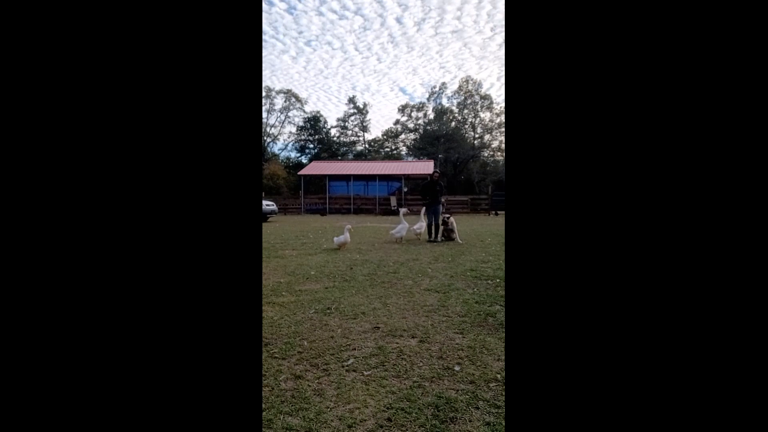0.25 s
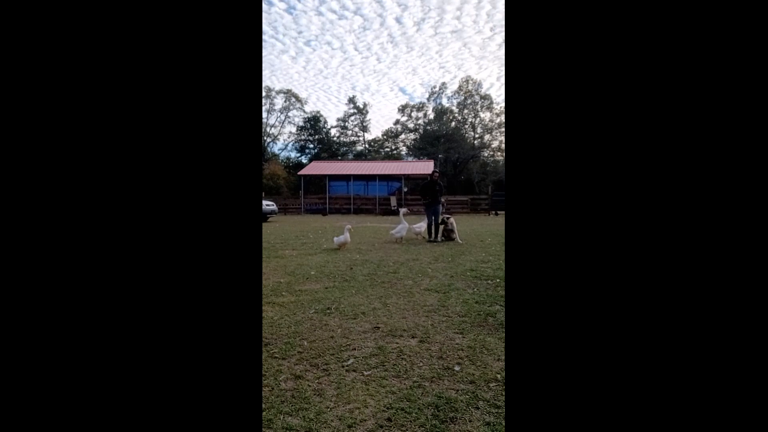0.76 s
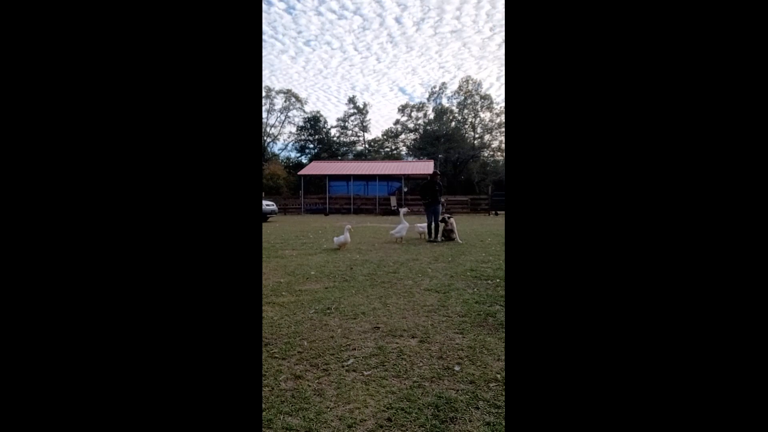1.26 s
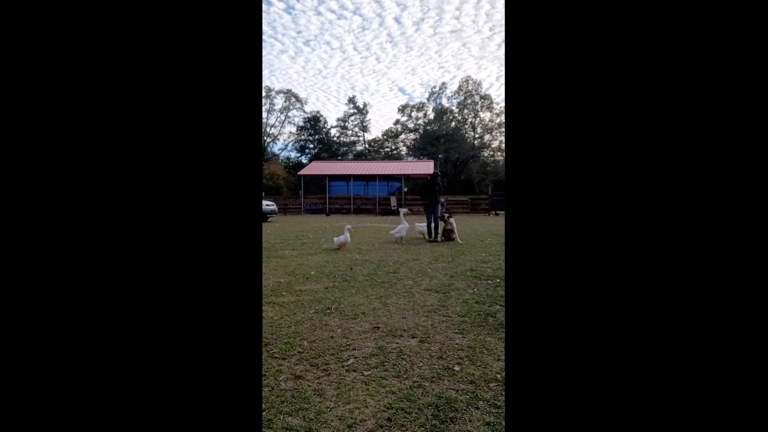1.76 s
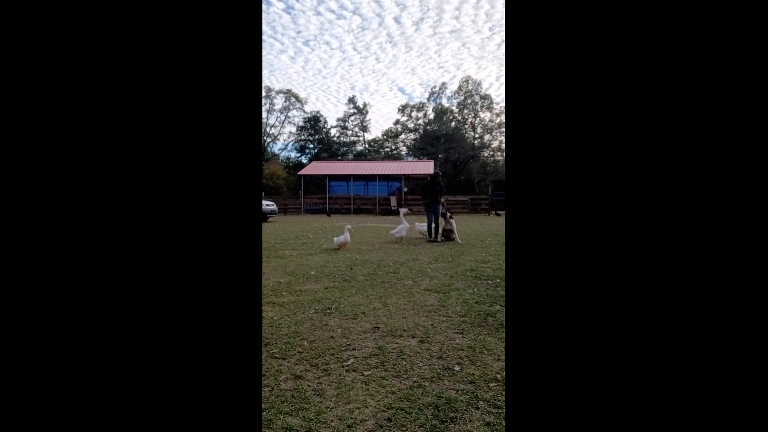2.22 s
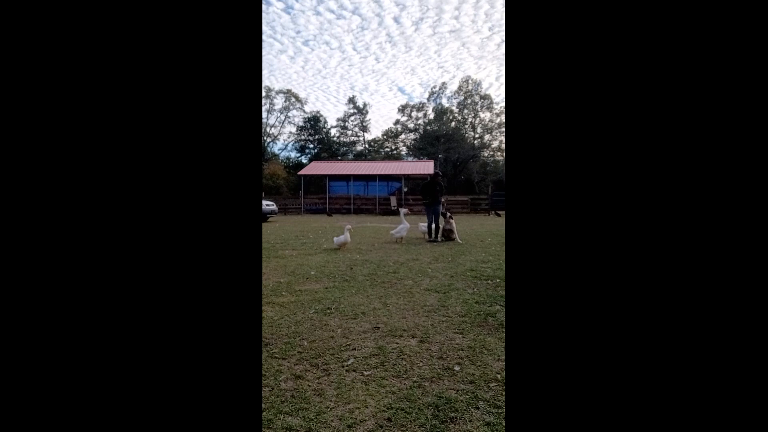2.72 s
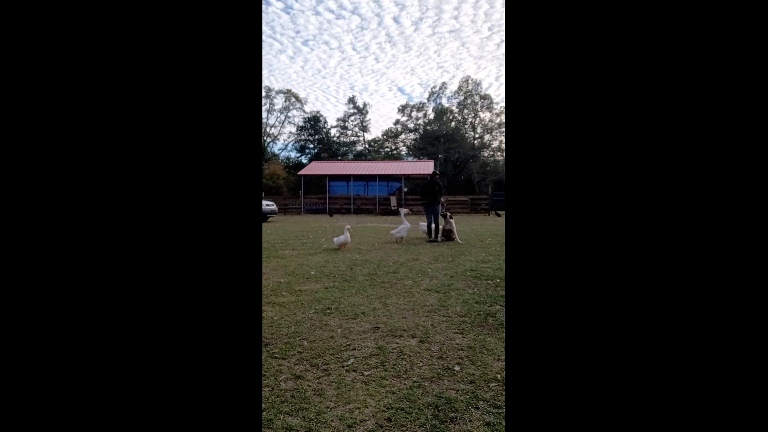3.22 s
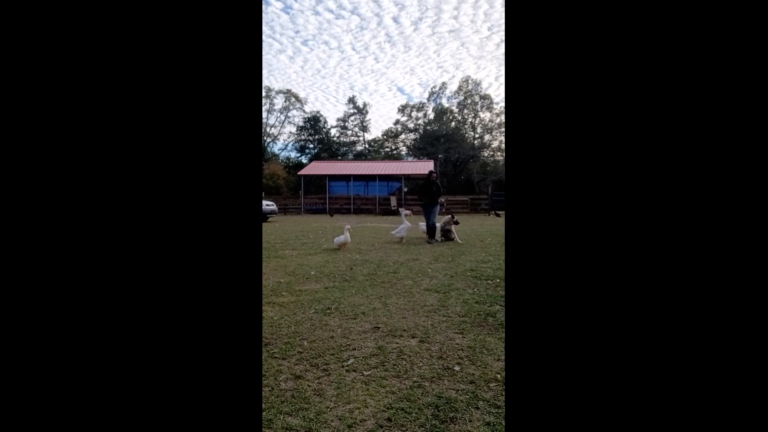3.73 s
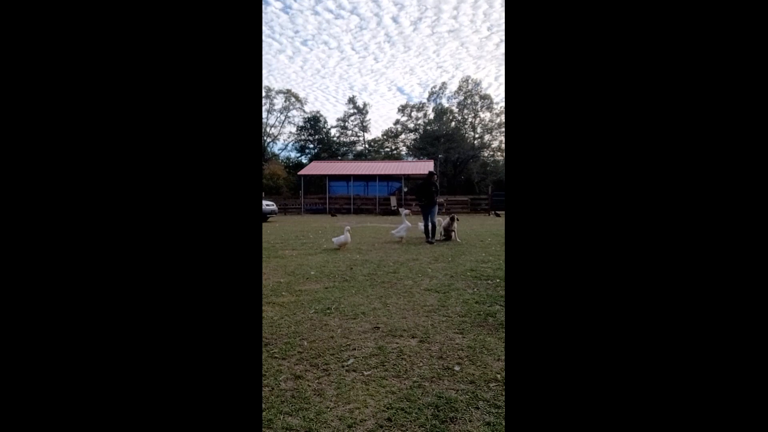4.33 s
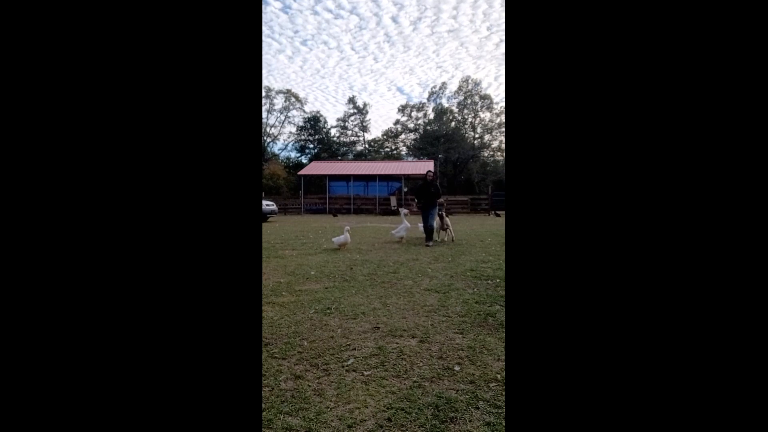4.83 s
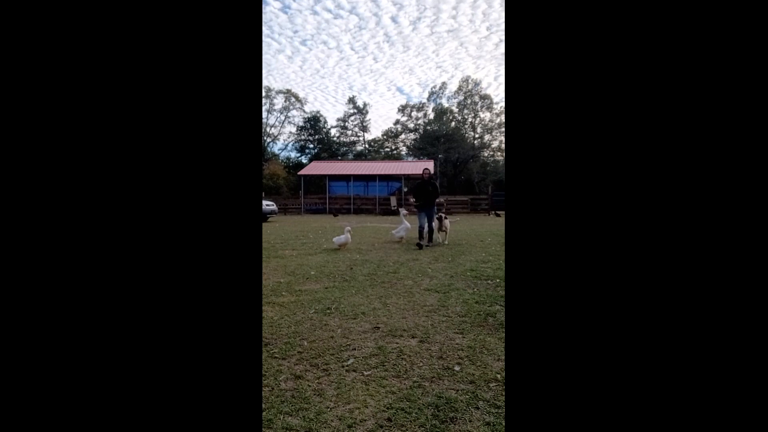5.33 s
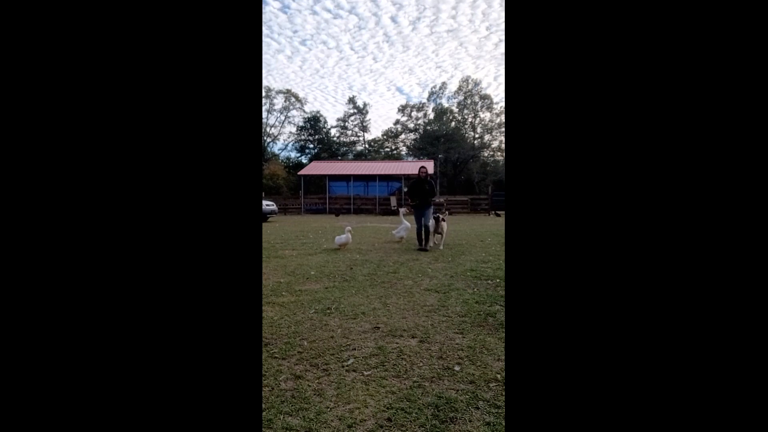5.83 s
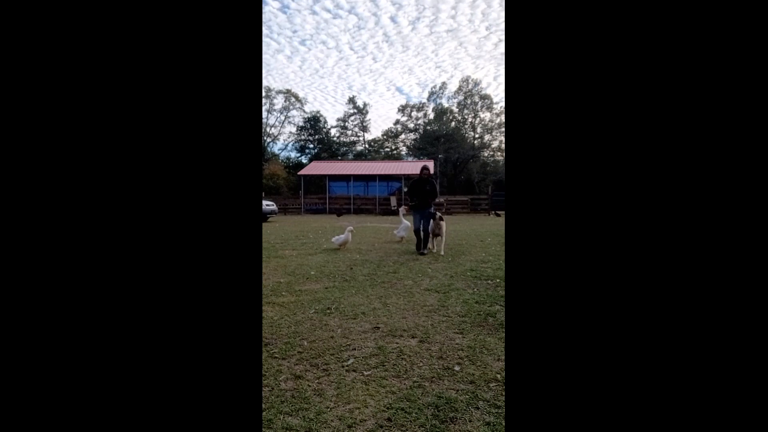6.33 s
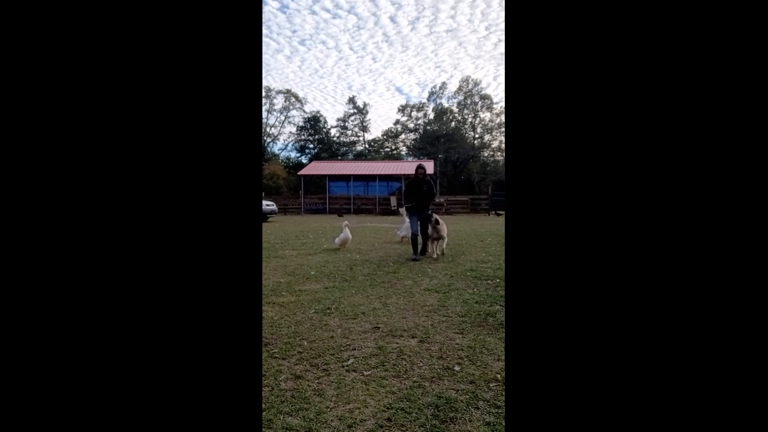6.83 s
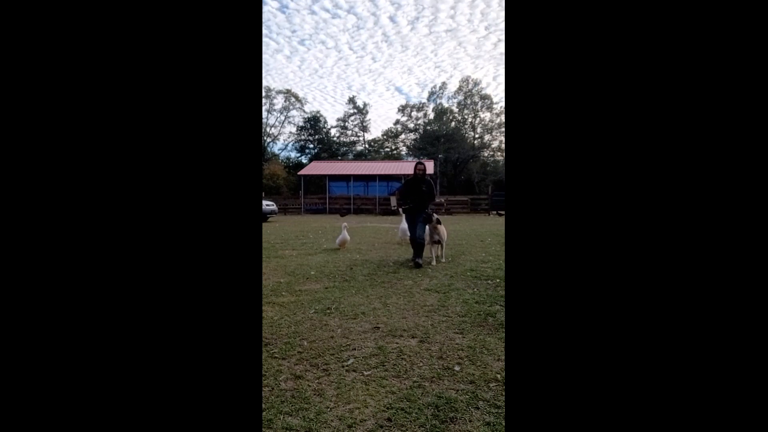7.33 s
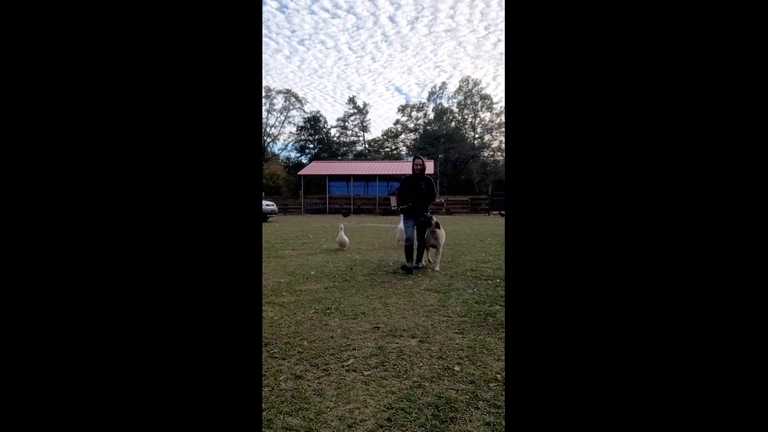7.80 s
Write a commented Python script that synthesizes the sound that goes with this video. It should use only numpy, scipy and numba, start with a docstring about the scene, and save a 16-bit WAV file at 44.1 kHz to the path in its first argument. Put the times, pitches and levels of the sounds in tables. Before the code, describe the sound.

The setting is a quiet open field with a low rumble, thin hiss and the faint hum of a distant idling engine throughout. A few soft dry ticks fall in the first second. At about 0.9 seconds a goose gives a raspy honk that breaks into a clear note, echoing lightly off a shed and trees. A faint far bird calls around 2.1 seconds. At 3.2 seconds a dog close to the microphone gives a short whine, followed at once by a long one from 3.4 to 5.1 seconds. It is high and nearly dry, hoarse in stretches, thinning to a whistle and ending in a tiny croak. A small tick follows at 5.4 seconds. The geese return with a soft broken honk at 6 seconds, a louder one from 6.5 to 6.9, and a longer, shriller run from 7.4 to 7.9 seconds.

```python
"""An open grass field, where geese honk and a shed and the tree line throw the honks back.
Each honk is a rattle of syrinx pulses that breaks into clear notes, coloured by resonances.
In the middle an animal close by, likely a dog, gives a short and a long whine: a whistle with
subharmonics, shaped by its muzzle. Below lie low rumble, the hum of a distant idling engine,
thin hiss, a few dry ticks and faint far birds."""
import sys
import numpy as np
from scipy import signal
from scipy.fft import rfft, irfft, next_fast_len
from scipy.io import wavfile
from scipy.ndimage import uniform_filter1d
from numba import njit

SR = 44100
rng = np.random.default_rng(int(sys.argv[2]) if len(sys.argv) > 2 else 0)


def dump_mix(stems):
    """Bounce the given channels to the path in sys.argv[1] as a 16-bit WAV at rate SR."""
    frames = np.atleast_2d(stems).T  # one column per channel
    limited = np.clip(frames, -1, 1)  # hard clip at full scale
    pcm = np.round(limited * 32767).astype(np.int16)
    wavfile.write(sys.argv[1], SR, pcm)


N = 355425
T = np.arange(N) / SR
CUTOFF_HZ = 15900
WHINE_ATTACK_S, WHINE_RELEASE_S = .022, .013

# honk syllables: (start t/s, length t/s, relative level/dB, swell/dB, chest level/dB,
#   brightness level/dB, rasp level/dB, sizzle level/dB, top level/dB, peak pulse rate f/Hz,
#   lower resonance first f/Hz, last f/Hz, upper resonance f/Hz)
HONKS = [(0.846, 0.023, -42.5, 6.0, -2, -24.5, -18, -21, -31, 150, 1480, 1570, 3570),
         (0.87, 0.12, -31.5, -10, 5.0, -6, -7, -14.5, -27, 204, 1380, 1090, 3190),
         (1.0, 0.16, -39.5, -8.5, -4.0, -11.5, -12.5, -29, -38.0, 126, 1470, 1290, 2720),
         (5.935, 0.094, -44.5, 12.5, 3, -4, -4, -18.0, -31, 111, 1610, 1420, 3370),
         (6.04, 0.068, -50, 1, 1, -9.0, -0.5, -22.5, -31, 135, 1530, 1570, 3120),
         (6.1, 0.058, -47.5, -1.5, 4.5, -0.5, 4.5, -21, -29.5, 153, 1390, 980, 2720),
         (6.537, 0.088, -33.5, 14.5, 0.5, -10.5, -11.5, -25, -27, 143, 1370, 1494, 2900),
         (6.635, 0.043, -45, 12, 7.5, -3, -7, -21, -31, 120, 1443, 1340, 3183),
         (6.685, 0.14, -33, 6.5, 7, -1.5, -6, -16.5, -30.5, 216, 1078, 1180, 3070),
         (6.803, 0.066, -31, -15, -11, -2, -9, -10, -25.5, 220, 1460, 1460, 2580),
         (7.419, 0.112, -29.5, 4.5, 3.5, -7.5, -11.5, -27, -39.5, 150, 1470, 1010, 2926),
         (7.525, 0.07, -39.5, -12, 8.5, 5, -2.5, -9.5, -27, 144, 1146, 899, 2600),
         (7.634, 0.094, -31.5, -0.5, 9, -2, -7, -10.5, -22.5, 169, 1098, 1210, 2830),
         (7.712, 0.07, -27, -6, -0.5, -8, -9, -10.5, -13, 204, 1152, 1501, 3080),
         (7.775, 0.041, -32.5, -7, 6, 7.5, 0, -4, 0, 136, 1440, 1470, 2960),
         (7.808, 0.11, -33, -10, 6.5, 1, -7, -12.5, -37, 141, 1180, 920, 2440)]
# clear notes in the honks: (start t/s, end t/s, first f/Hz, middle f/Hz, last f/Hz,
#   level/dB over the rattle, even harmonics level/dB, overtone roll-off f/Hz)
NOTES = [(.868, 1.005, 900, 1008, 865, 10, 3, 3300), (.87, 1.015, 485, 468, 405, 1, 0, 3000),
         (.985, 1.185, 742, 728, 640, 20, 6, 5200), (5.945, 6.055, 450, 463, 445, 4, 0, 2200),
         (6.035, 6.125, 735, 765, 815, 9, 5, 2800), (6.1, 6.18, 345, 352, 340, 3, 0, 1200),
         (6.7, 6.825, 182, 197, 203, 8, 0, 1900), (6.795, 6.845, 1295, 1315, 1320, 7, 10, 3000),
         (6.8, 6.89, 722, 742, 733, 11, 9, 4500), (7.645, 7.72, 148, 163, 172, 7, 0, 2000),
         (7.69, 7.79, 338, 352, 362, 10, 0, 5500), (7.735, 7.825, 1410, 1468, 1492, 12, 0, 16000),
         (7.81, 7.885, 750, 738, 700, 1, 6, 6000)]
# whines: (start t/s, break into the low register t/s, end t/s, relative level/dB)
WHINES = [(3.154, 3.21, 3.409, 2.5), (3.385, 3.501, 5.108, 0.5)]
# thinning of the whine from a full cry to a whistle: (t/s, share 0-1)
THINNING = [(3.19, 0.14), (3.25, 0.57), (3.38, 0.37), (3.48, 0.08), (4.22, 0.12), (4.45, 0.83), (4.68, 1),
            (4.87, 0.95), (5.03, 0.9), (5.07, 0.86)]


def amp(db):
    """Amplitude ratio of a level in decibels."""
    return 10 ** (np.asarray(db) / 20)


def unit(x):
    """Normalisation to rms 1."""
    return x / np.sqrt(np.mean(x ** 2) + 1e-20)


def curves(rows, t=T):
    """Linear interpolation in time of each column of a table."""
    times, *columns = np.transpose(rows)
    return [np.interp(t, times, column) for column in columns]


def at_hz(points, hz):
    """Interpolation of a spectrum on a log-frequency axis."""
    f, value = np.transpose(points)
    return np.interp(np.log(np.maximum(hz, 1)), np.log(f), value)


def colour(x, points):
    """Zero-phase filtering by a spectral envelope of (f/Hz, level/dB) points."""
    size = next_fast_len(N + SR // 4)
    gain = amp(at_hz(points, np.fft.rfftfreq(size, 1 / SR)))
    return irfft(rfft(x, size) * gain, size)[..., :N]


def band(x, low_hz, high_hz, order=4):
    """Band-pass filtering."""
    sos = signal.butter(order, [low_hz, min(high_hz, .48 * SR)], "band", fs=SR, output="sos")
    return signal.sosfilt(sos, x + 1e-18)


def wobble(rate_hz, size=N):
    """Random modulation: low-passed noise of rms 1."""
    noise = rng.standard_normal(size + SR)
    return unit(signal.sosfilt(signal.butter(2, rate_hz, fs=SR, output="sos"), noise)[SR:])


def gate(start, end, edge_s, t=T):
    """Trapezoidal window between two times."""
    return np.clip(np.minimum(t - start, end - t) / edge_s + .5, 0, 1)


def progress(start, length, t=T):
    """Normalised time, -1 to 1 through an event."""
    return np.clip(2 * (t - start) / length - 1, -1, 1)


def envelope(start, end, attack_s, release_s):
    """Linear attack, hold and exponential decay."""
    return np.clip((T - start) / attack_s, 0, 1) * np.exp(-np.clip((T - end) / release_s, 0, 20))


def articulate(source, levels, edges_hz, window_s):
    """Time-varying filtering by throat and mouth: each band is evened, then follows its own level."""
    out, size = np.zeros(N), int(window_s * SR)
    for level, low, high in zip(levels, edges_hz, edges_hz[1:]):
        part = band(source, low, high, order=6)
        power = uniform_filter1d(uniform_filter1d(part ** 2, size), size)
        out += level * part / np.sqrt(np.abs(power) + 1e-9)
    return out


def stereo_noise(spectrum, width):
    """Partial coherence: coloured noise common to both ears, plus a share in antiphase."""
    mid, side = colour(rng.standard_normal((2, N)), spectrum)
    return unit(mid + width * side * np.array([[1], [-1]]))


def engine_hum():
    """Amplitude modulation: the wavering partials of a distant idling engine throb together."""
    # engine partials: (f/Hz, relative level/dB)
    partials = [(102.3, -77.5), (140.0, -76), (242.2, -76)]
    hum = 0
    for hz, db in partials:
        phase = 2 * np.pi * np.cumsum(hz * (1 + .0083 * wobble(8.7))) / SR
        hum += amp(db - 5.5) * np.sqrt(2) * np.sin(phase)
    return hum * (1 + .4 * np.cos(2 * np.pi * 17.3 * T))


def background():
    """Ambient noise: lumpy rumble, far air, engine hum and thin hiss add incoherently."""
    # course of the ambience: (t/s, relative rumble level/dB, relative air level/dB)
    field_levels = [(0.0, -65, -65.5), (1.08, -65, -65), (2.13, -65, -66.5), (2.96, -64.5, -63.5),
                    (3.39, -68.5, -65), (4.67, -74.5, -68.5), (5.12, -63.5, -63), (5.72, -69.5, -63),
                    (6.73, -62, -64.5), (7.63, -64.5, -61), (8.06, -67, -59)]
    # course of the hiss: (t/s, level/dB)
    hiss_levels = [(0, -73), (1.3, -75), (3.0, -74), (5.2, -67), (8.06, -69.5)]
    # spectra of the three noises: (f/Hz, relative level/dB)
    rumble_spectrum = [(12, -62.5), (20, -33.5), (70, -2.5), (108, -6.5), (140, 0.5), (180, -21),
                       (230, -35.5), (400, -120)]
    air_spectrum = [(76, -21.5), (130, -5), (318, -2), (367, -4.5), (746, -11.5), (884, -13), (944, -8.5),
                    (1260, -15.5), (1480, -22), (1800, -27), (3000, -52.5), (3900, -60.5), (6600, -120)]
    hiss_spectrum = [(1000, 6.5), (2200, -5.5), (6000, -9.5), (9000, -17.5), (13000, -15), (15500, -23)]
    rumble_db, air_db = curves(field_levels)
    rumble_gain = amp(rumble_db + 3 + 2.8 * wobble(24))
    rumble = rumble_gain * unit(band(stereo_noise(rumble_spectrum, width=.029), 30, 400, order=2))
    air = amp(air_db + 2.5 + 2.37 * wobble(4.1)) * stereo_noise(air_spectrum, width=.076)
    hum = engine_hum()
    hiss = amp(curves(hiss_levels)[0]) * stereo_noise(hiss_spectrum, width=.94)
    return rumble + air + hum + hiss


def ticks(level_db, crack_db):
    """Damped transients: dry ticks and scuffs are band-limited noise bursts with a faint broad crack."""
    # ticks: (t/s, relative peak level/dB, centre f/Hz, bandwidth/octaves, decay t/s)
    events = [(0.063, -64.5, 1700, 0.94, .002), (0.07, -74, 5300, 0.72, .012),
              (0.409, -67.5, 5740, 0.74, 0.0087), (0.658, -56.5, 2440, 1.3, .0015),
              (0.668, -57.5, 2370, 1.1, .0012), (0.777, -70.5, 2680, 1, 0.017),
              (1.571, -61, 2400, 0.22, .0015), (2.785, -76, 2380, 0.46, 0.011),
              (5.406, -55, 1380, 0.63, 0.0069)]
    out, t = np.zeros((2, N)), np.arange(SR // 8) / SR
    for start, db, hz, octaves, decay_s in events:
        noise = rng.standard_normal(len(t)) + .5 * rng.standard_normal((2, len(t)))
        burst = noise * t * np.exp(-t / decay_s)
        ring = band(burst, hz / 2 ** (octaves / 2), hz * 2 ** (octaves / 2), order=2)
        tick = ring + amp(crack_db) * band(burst, 1500, 6300, order=2)
        first = int(start * SR)
        out[:, first:first + len(t)] += amp(db + level_db) * tick / np.abs(tick).max()
    return out


def far_birds():
    """Frequency modulation: thin gliding notes of far birds, made scratchy by pitch jitter."""
    # calls: (start t/s, length t/s, first f/Hz, last f/Hz, peak level/dB, jitter as a share)
    calls = [(0.49, 0.04, 1660, 1630, -62.5, .01), (2.124, 0.23, 988, 973, -61.5, .03),
             (2.61, 0.067, 3770, 3450, -77, 0.037), (2.665, 0.045, 3150, 2830, -78, .04)]
    out, scratch = np.zeros(N), wobble(300)
    for start, length, first_hz, last_hz, db, jitter in calls:
        hz = np.interp(T, [start, start + length], [first_hz, last_hz]) * (1 + jitter * scratch)
        out += amp(db) * (1 - progress(start, length) ** 2) * np.sin(2 * np.pi * np.cumsum(hz) / SR)
    return out


def honk_resonances(x, flutter_db=0, low_cut_hz=780):
    """Resonance: parallel peaks, each applied twice; the upper ones are driven through a low cut."""
    # resonances of the honk; the last is a thin, very high fizz on every honk: (f/Hz, nominal bandwidth f/Hz,
    # level/dB)
    resonances = [(140.5, 9.4, 1.5), (447, 46, 0), (1120, 298, 10), (1595, 163, 3), (1920, 366, -2.5),
                  (3110, 880, 1), (4340, 570, -12.5), (6940, 160, -5), (14700, 870, -21.5)]
    out, upper_drive = 0, band(x, low_cut_hz, 16000)
    for hz, width_hz, db in resonances:
        b, a = signal.iirpeak(hz, hz / (1.84 * width_hz), fs=SR)
        drive = upper_drive if hz > low_cut_hz else x + 1e-18
        # each resonance swells by itself
        swell = amp(flutter_db * wobble(14.4, size=len(x))) if flutter_db else 1
        out = out + amp(db) * swell * signal.lfilter(b, a, signal.lfilter(b, a, drive))
    return out


def pulse_rate(slowing=.13):
    """Repetition frequency of the rattle: highest in mid-syllable, slower at both ends."""
    rate = np.full(N, float(HONKS[0][-4]))
    for start, length, *_, peak_hz, _, _, _ in HONKS:
        on = T >= start
        rate[on] = peak_hz * (1 - slowing * progress(start, length, T[on]) ** 2)
    return rate


def rattle(jitter, uneven_db, rasp, puff_s, flutter_db):
    """Impulse excitation: uneven slaps of the syrinx, each with a puff of rasp, ring the resonances."""
    cycles = np.floor(np.cumsum(pulse_rate() * (1 + jitter * wobble(70))) / SR)
    pulses = np.diff(cycles, prepend=0) * amp(uneven_db * rng.standard_normal(N))
    decays = signal.lfilter([1], [1, -np.exp(-1 / (puff_s * SR))], pulses + 1e-18)
    puffs = decays * rng.standard_normal(N)
    return unit(honk_resonances(unit(pulses) + rasp * unit(puffs), flutter_db))


def clear_notes(jitter):
    """Periodic oscillation: the membranes lock into a harmonic tone on a short arched glide."""
    out, waver = np.zeros(N), 1 + jitter * wobble(220)
    for start, end, first_hz, middle_hz, last_hz, db, even_db, fade_hz in NOTES:
        on = slice(int(start * SR), int(end * SR))
        u = np.linspace(-1, 1, on.stop - on.start)
        hz = middle_hz + u * (last_hz - first_hz) / 2 + u ** 2 * ((first_hz + last_hz) / 2 - middle_hz)
        phase = 2 * np.pi * np.cumsum(hz * waver[on]) / SR
        tone = sum(amp(even_db * (k % 2 == 0)) * np.cos(k * phase) / (1 + (k * middle_hz / fade_hz) ** 6)
                   for k in range(1, int(CUTOFF_HZ / middle_hz) + 1))
        out[on] += amp(db) * unit(honk_resonances(tone)) * (1 - u ** 4)
    return out


def shut_beak(x, below_db=-40.5, range_db=7):
    """Level-dependent filtering: the softer a syllable, the more it takes the shut beak's colour."""
    # response of the nearly shut beak: (f/Hz, level/dB)
    response = [(200, 9), (450, 12), (750, 0), (2200, 5), (2800, 3), (3800, 11.5), (4400, -8),
                (5200, -11.5), (7000, -18)]
    shut = sum(np.clip((below_db - db) / range_db, 0, 1) * envelope(start, start + length, .01, .05)
               for start, length, db, *_ in HONKS)
    return x + np.minimum(shut, 1) * (colour(x, response) - x)


@njit
def driven_oscillator(x, step, damping):
    """A damped, driven oscillator: a two-pole band-pass of gain 1 whose centre moves."""
    out, low, mid = np.zeros(len(x)), 0., 0.
    for i in range(len(x)):
        low += step[i] * mid
        mid += step[i] * (x[i] - low - damping[i] * mid)
        out[i] = mid * damping[i]
    return out


def resonate(x, hz, width_hz):
    """Resonance at a frequency that changes with time."""
    hz = np.clip(hz, 300, 7000)
    return driven_oscillator(x, 2 * np.sin(np.pi * hz / SR), np.minimum(width_hz / hz, .5))


def moving_beak(x):
    """Formant motion: one resonance glides with the beak, one sits above, narrow ones wander."""
    lower, upper = np.full(N, float(HONKS[0][-3])), np.full(N, float(HONKS[0][-1]))
    for start, length, *_, first_hz, last_hz, upper_hz in HONKS:
        on = T >= start
        lower[on] = np.interp(T[on], [start, start + length], [first_hz, last_hz])
        upper[on] = upper_hz
    x = x + amp(8.5) * resonate(x, lower, width_hz=314) + amp(9) * resonate(x, upper, width_hz=560)
    wandering = sum(resonate(x, hz * (1 + .06 * wobble(14)), width_hz=130)
                    for hz in (2650, 3700, 4400, 5400))
    return x + amp(7) * wandering


def honk_levels(lean_db_per_octave=8):
    """Band envelopes: each syllable is an arch of level with its own colour; overlaps add in power."""
    # loss at both ends of a syllable, per band from chest to top: (level/dB)
    arches = [6, 0.92, 6.9, 7.8, 8.2, 15]
    power = np.zeros((len(arches), N))
    for start, length, db, swell_db, chest_db, *upper_db, _, first_hz, last_hz, _ in HONKS:
        shape = envelope(start, start + length, attack_s=.016, release_s=.021)
        on = shape > 1e-4
        u = progress(start, length, T[on])
        # as the lower resonance sinks, the chest gains on the band above it
        lean_db = lean_db_per_octave * np.log2(first_hz / last_hz) * u / 2
        for k, (band_db, arch_db) in enumerate(zip([chest_db + lean_db, -lean_db, *upper_db], arches)):
            power[k, on] += (shape[on] * amp(db + band_db + swell_db * u / 2 - arch_db * u ** 2)) ** 2
    return np.sqrt(power)


def geese():
    """Source and filter: rattle and clear notes pass through the same resonances and beak."""
    # band edges of a honk, from chest to top: (f/Hz)
    edges = [90, 1300, 2100, 3400, 4800, 7200, 16000]
    pulses = rattle(jitter=.055, uneven_db=1.8, rasp=.5, puff_s=.004, flutter_db=3)
    voice = moving_beak(shut_beak(pulses + clear_notes(jitter=.007)))
    return amp(-3) * articulate(voice, honk_levels(), edges, window_s=.0094)


def carry(boost_db=1, above_hz=600):
    """Propagation gain: high clear notes carry best to the shed and trees."""
    high = sum(gate(start, end, .02) for start, end, _, hz, *_ in NOTES if hz > above_hz)
    return amp(boost_db * np.minimum(high, 1))


def field_echo(x, near_db, tail_db, t60, smear_s):
    """Reflection: ground scatter, smeared echoes and a thin tail from the trees, unlike at each ear."""
    # echoes off shed and trees: (delay t/s, relative level/dB)
    echoes = [(.075, -14.5), (0.116, -17), (.19, -30)]
    # response of the reflected paths: (f/Hz, level/dB)
    spectrum = [(200, -19), (900, -5.5), (1500, -7.5), (1950, 3.5), (2250, 14), (2650, 5.5), (3000, -3.5),
                (3600, -2.5), (4350, 3), (5300, -3.5), (12000, -8)]
    t = np.arange(SR) / SR

    def burst(delay_s, decay_s):
        """Diffuse reflection: delayed, decaying noise of unit mean energy per ear."""
        noise = rng.standard_normal((2, SR)) * (t > delay_s) * np.exp(-np.abs(t - delay_s) / decay_s)
        return noise / np.sqrt(np.sum(noise ** 2) / 2)
    scatter = amp(-11) * burst(.0005, .003) + amp(near_db) * burst(.0063, .032)
    tail = amp(tail_db) * burst(.03, t60 / np.log(1000))
    response = scatter + tail + sum(amp(db) * burst(delay_s, smear_s) for delay_s, db in echoes)
    return colour(signal.fftconvolve(x[None], response, axes=1)[:, :N], spectrum)


def whine_gesture(high_ratio=1.6, scoop=.16, scoop_s=.033, swell_s=.036, break_s=.013):
    """Register break, as pitch and gain: a whine scoops up high, drops to its note and gives out."""
    # fundamental in the low register: (t/s, f/Hz)
    pitch = [(3.2, 366), (3.3, 367), (3.36, 373), (3.39, 362), (3.5, 378), (3.555, 388), (3.6, 418),
             (3.65, 405), (3.69, 371), (3.8, 383), (3.9, 383), (4.07, 379), (4.12, 402), (4.2, 397),
             (4.25, 381), (4.45, 377), (4.72, 377), (4.84, 374), (4.92, 365), (5.0, 361), (5.05, 340),
             (5.11, 345)]
    flutter = np.sin(2 * np.pi * np.cumsum(41 + 5 * wobble(10)) / SR)
    note = curves(pitch)[0] * (1 + .007 * gate(3.55, 4.32, .1) * flutter)   # flutters in full cry
    hz, gain = note, np.zeros(N)
    for start, broken, end, db in WHINES:
        flat, held_back = (1 - np.exp(-(np.maximum(broken - T, 0) / s) ** 4) for s in (scoop_s, swell_s))
        hz = np.where((T >= start) & (T < broken), note * high_ratio * (1 - scoop * flat), hz)
        lead_in_db = (T < broken) * (-1.5 - 6 * held_back)
        give_out_db = -6.5 * np.exp(np.minimum(T - end, 0) / .028)
        shape = envelope(start, end, WHINE_ATTACK_S, WHINE_RELEASE_S)
        gain = np.maximum(gain, amp(db + lead_in_db + give_out_db) * shape)
    hz, gain = uniform_filter1d(np.array([hz, gain]), int(break_s * SR))
    return hz * (1 + .0015 * wobble(7.8)), np.maximum(gain, 0)


def whine_levels(gain, overtone_exponent=2.14, quiver_db=.7):
    """Band envelopes: as the voice thins, the bands beside the whistle fade; each band quivers."""
    # bands below and above the whistle: (full-cry level/dB, change when thin/dB, exponent of the gain)
    flanks = [(-24.5, -18.5, 1.83), (-30, -27, 1.76)]
    # courses of the whistle and of the four top bands, in rising order: (t/s, relative level/dB)
    whistle_levels = [(3.17, -35), (3.203, -32), (3.216, -22), (3.372, -22), (3.395, -39), (3.46, -43),
                      (3.51, -30), (3.7, -28), (4.07, -27.5), (4.15, -29.5), (4.3, -24.5), (4.52, -22),
                      (4.56, -26), (4.69, -22.5), (4.8, -25.5), (4.92, -22), (4.995, -21.5), (5.02, -28),
                      (5.05, -33), (5.075, -31), (5.105, -37)]
    upper_middle = [(3.19, -43), (3.25, -56.5), (3.38, -51), (3.51, -36.5), (3.7, -41), (4.5, -52),
                    (4.87, -58), (4.96, -73)]
    squeal = [(3.399, -60), (3.7, -52.5), (4.519, -57.5), (4.72, -83.5), (4.92, -63.5), (5.03, -44.5),
              (5.07, -51.5)]
    ring = [(3.301, -43.5), (3.55, -39.5), (4.05, -40), (4.13, -38.5), (4.3, -40), (4.8, -39), (5.0, -49.5),
            (5.05, -52)]
    treble = [(3.25, -59), (3.55, -48.5), (4.25, -55), (4.6, -51), (4.88, -46), (5.02, -61.5)]
    thin, = curves(THINNING)
    sounding = envelope(WHINES[0][0], WHINES[-1][2], WHINE_ATTACK_S, WHINE_RELEASE_S)
    whistle = amp(curves(whistle_levels)[0] - 1.5) * sounding
    upper = [amp(curves(rows)[0]) * gain ** overtone_exponent
             for rows in (upper_middle, squeal, ring, treble)]
    low, middle = [gain ** exponent * amp(db + thin * thin_db) for db, thin_db, exponent in flanks]
    return [level * amp(quiver_db * wobble(25)) for level in (low, whistle, middle, *upper)]


def mouth_formants(t):
    """Formant drift: the bright resonances move with the mouth and change height as the voice thins."""
    # resonances: (rest f/Hz, half width f/Hz, share of the drift, full-cry level/dB, thin level/dB)
    formants = [(4490, 190, -0.25, 8.5, 3), (5257, 200, 0.9, 18, 27.5), (6542, 152, 0.47, 16, 19.5),
                (7660, 140, 0.25, 22.5, 2.5), (8500, 110, -0.2, 8, 19.5), (9920, 290, 0.057, 8, 13)]
    # path of the second resonance: (t/s, f/Hz)
    path = [(3.3, 5724), (3.55, 5050), (3.95, 5156), (4.22, 5224), (4.48, 5485), (4.68, 5540), (4.9, 5670),
            (5.0, 5970), (5.1, 5570)]
    drift_hz = curves(path, t)[0] - formants[1][0]
    thin, = curves(THINNING, t)
    return [(rest_hz + share * drift_hz, width_hz, full_db + thin * (thin_db - full_db))
            for rest_hz, width_hz, share, full_db, thin_db in formants]


def whine(whistle_db, even_db, odd_loss_db):
    """Period doubling: a whistle (harmonic 4) with three tiers of subharmonics, hoarse in stretches."""
    # hoarse stretches: (start t/s, end t/s, roughness 0-1)
    hoarse = [(3.15, 3.21, .5), (3.375, 3.503, .7), (3.565, 3.67, .9), (3.67, 4.08, .12),
              (3.848, 3.872, .9), (4.08, 4.24, .7), (4.24, 4.3, .25), (4.54, 4.67, .65), (5.05, 5.12, .9)]
    # lines halfway between the harmonics: (t/s, relative level/dB)
    split_levels = [(3.15, -15), (3.7, -17.5), (4.2, -26), (4.32, -3.5), (4.5, -15.5), (4.75, -2),
                    (4.91, 2.5), (4.96, -34.5)]
    # response of the muzzle: (f/Hz, level/dB)
    muzzle = [(380, -67), (600, -18), (760, -7.5), (1140, -5.5), (1510, 10), (1750, -14.5), (2000, -6),
              (2300, -21), (2650, -24), (3050, -29.5), (3700, -70), (4300, -26), (6000, -35), (7200, -34.5),
              (8600, -33.5), (10200, -45.5), (11500, -51.5), (15500, -42.5)]
    # band edges of the whine: (f/Hz)
    edges = [560, 1300, 1780, 2350, 3600, 4450, 7200, 16000]
    start, end = WHINES[0][0], WHINES[-1][2]
    on = slice(int((start - .1) * SR), int((end + .07) * SR))
    t = T[on]
    pitch, gain = whine_gesture()
    rough = .045 + sum(depth * gate(a, b, .012, t) for a, b, depth in hoarse)
    hz = pitch[on] * (1 + .042 * rough * wobble(85, size=len(t)))
    # cycle-to-cycle tremor blurs the high harmonics, less so as the voice thins
    tremor = np.interp(t, [4.2, 4.35], [.036, .011]) * wobble(250, size=len(t))
    phase = 2 * np.pi * np.cumsum(hz) / SR + tremor
    shiver = 1 + .25 * rough * wobble(90, size=len(t))
    split, formants = amp(curves(split_levels, t)[0]), mouth_formants(t)
    odd_db = -odd_loss_db * gate(4.945, end, .03, t)   # odd harmonics drop out at the very end
    tone, knots = np.zeros(len(t)), t[::1500]
    for k in np.arange(2, 84) / 2:
        weight = split if k % 1 else amp(whistle_db * (k == 4) + (odd_db if k % 2 else even_db))
        lift_db = sum(db * np.exp(-np.minimum(((k * hz - centre) / width) ** 2, 20))
                      for centre, width, db in formants)
        # each overtone swells and fades by itself
        lift_db += 4 * (k > 5) * np.interp(t, knots, rng.standard_normal(len(knots)))
        response = (k * hz < CUTOFF_HZ) * amp(at_hz(muzzle, k * hz) + lift_db)
        tone += weight * response * np.cos(k * phase + rng.uniform(0, 2 * np.pi))
    breath = unit(colour(rng.standard_normal(N), muzzle))[on] * (1 + np.cos(phase))
    source = np.zeros(N)
    source[on] = unit(tone) * shiver + breath * (.005 + .055 * rough)
    return articulate(source, whine_levels(gain), edges, window_s=.026)


def close_up(x, lag_s):
    """Interaural cues: close up, each side has its own colour and the treble reaches the right later."""
    # left over right: (f/Hz, level/dB)
    balance = [(760, 5), (1140, -2), (1380, -3), (1510, -7), (1900, 4.5), (2650, -5.5), (3050, 10),
               (4500, 5.5), (5300, -2.5), (6600, 1.5), (9000, 3.5)]
    left, right = (colour(x, [(hz, side * db / 2) for hz, db in balance]) for side in (1, -1))
    lag_change = np.interp(T - lag_s, T, right) - right
    return np.array([left, right + colour(lag_change, [(1500, -35), (3000, 5.5)])])


def far_ring(x, level_db, t60, low_hz, high_hz):
    """Reverberation: the whistle hangs on faintly among the far trees."""
    t = np.arange(2 * SR) / SR
    response = rng.standard_normal(len(t)) * amp(-60 * t / t60)
    response /= np.sqrt(np.sum(response ** 2))
    return amp(level_db) * signal.fftconvolve(band(x, low_hz, high_hz, order=2), response)[:N]


def croak(level_db, overtone_db):
    """Jittered glide: as the whine gives out, it croaks down about an octave."""
    hz = np.interp(T, [5.04, 5.07, 5.115], [690, 460, 310]) * (1 + .05 * wobble(200))
    phase = 2 * np.pi * np.cumsum(hz) / SR
    overtones = sum(np.sin(k * phase) for k in (2, 3)) * np.clip((2100 - 3 * hz) / 600, 0, 1)
    return amp(level_db) * gate(5.048, 5.105, .012) * (np.sin(phase) + amp(overtone_db) * overtones)


def scene():
    """Superposition: far honks and their echoes, the close, nearly dry whine, ticks, birds and field."""
    honks = geese()
    cry = whine(whistle_db=-4, even_db=3, odd_loss_db=20.5) + croak(level_db=-42, overtone_db=-1)
    carried = carry() * honks + .16 * cry
    echo = field_echo(carried, near_db=-5, tail_db=-16.5, t60=.93, smear_s=.0085)
    echo += far_ring(cry, level_db=-33, t60=3.6, low_hz=1210, high_hz=1680)
    voices = honks + close_up(cry, lag_s=.000022) + echo
    return voices + ticks(level_db=10.5, crack_db=-24) + far_birds() + background()


def record(dry):
    """Band limiting: a steep low-pass cuts the top."""
    return signal.sosfilt(signal.ellip(12, .1, 80, CUTOFF_HZ, fs=SR, output="sos"), dry)


dry = scene()
out = record(dry)
dump_mix(out)
```